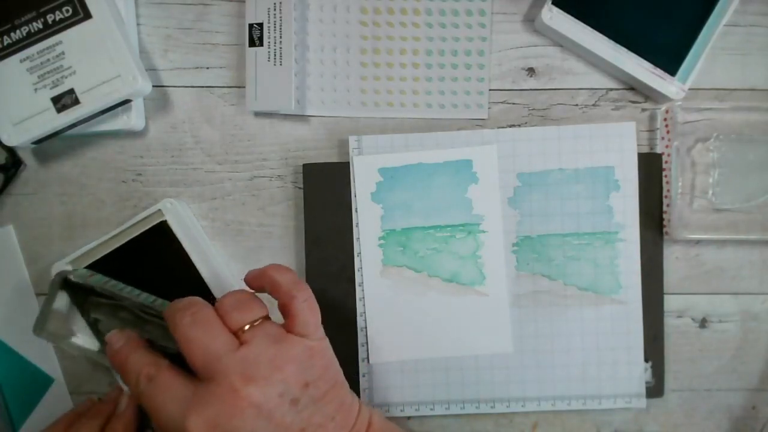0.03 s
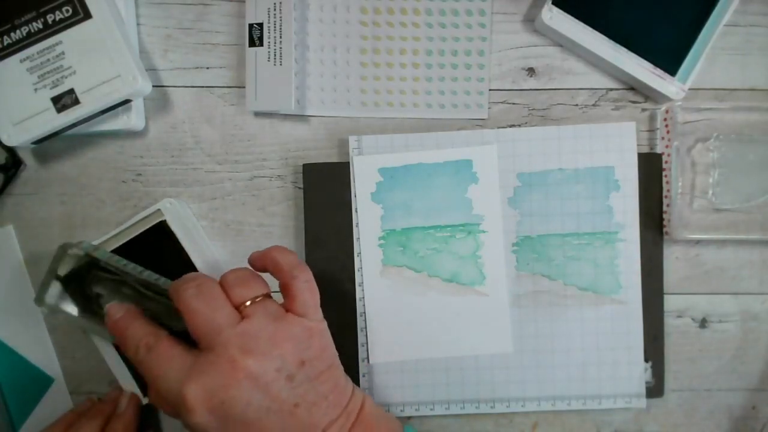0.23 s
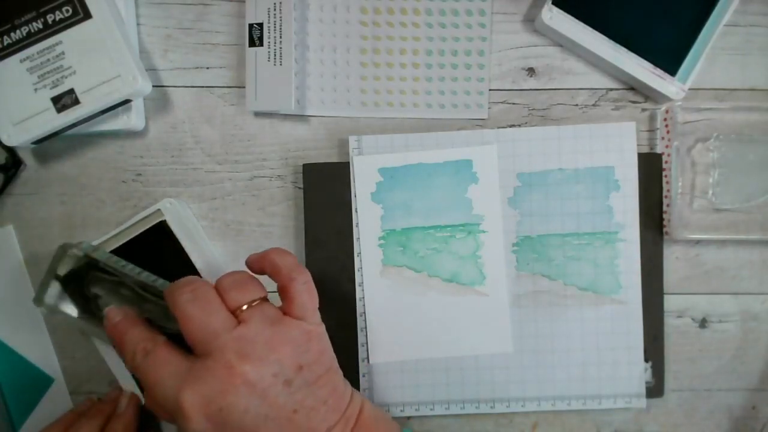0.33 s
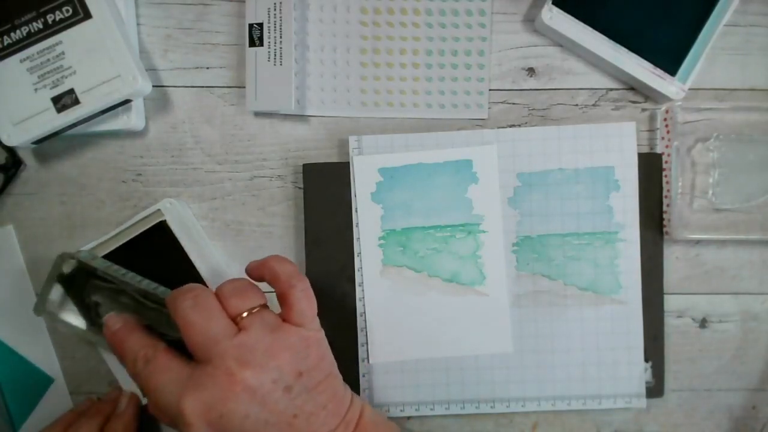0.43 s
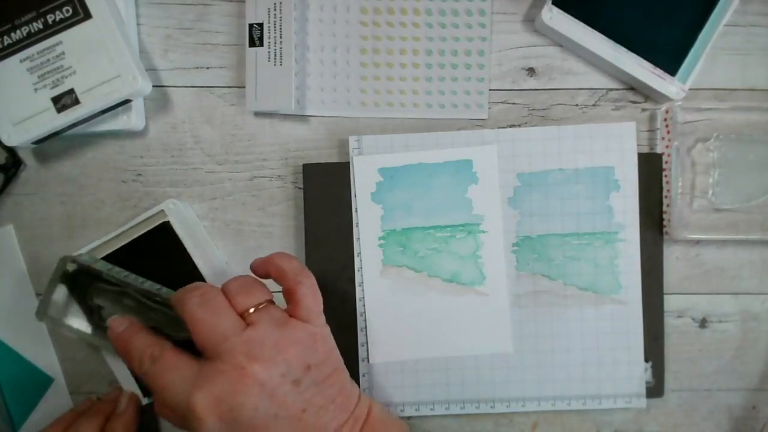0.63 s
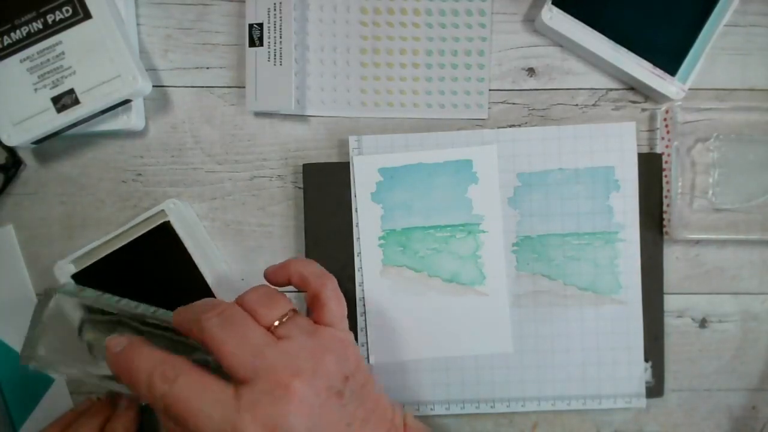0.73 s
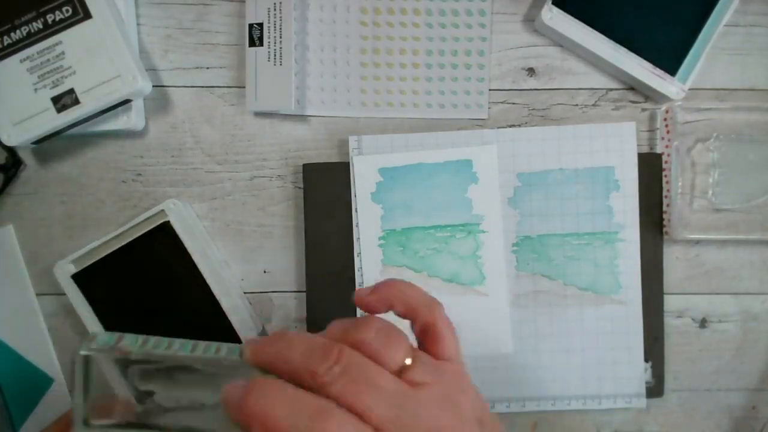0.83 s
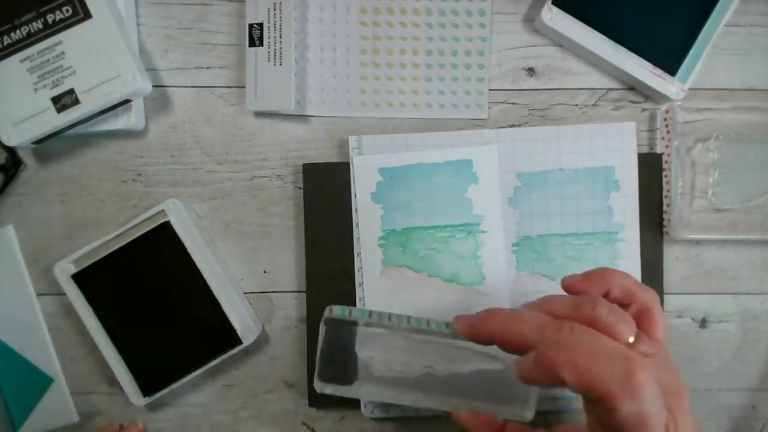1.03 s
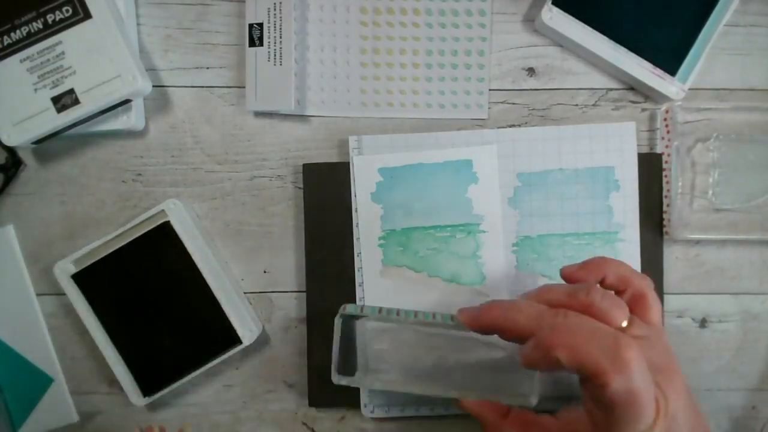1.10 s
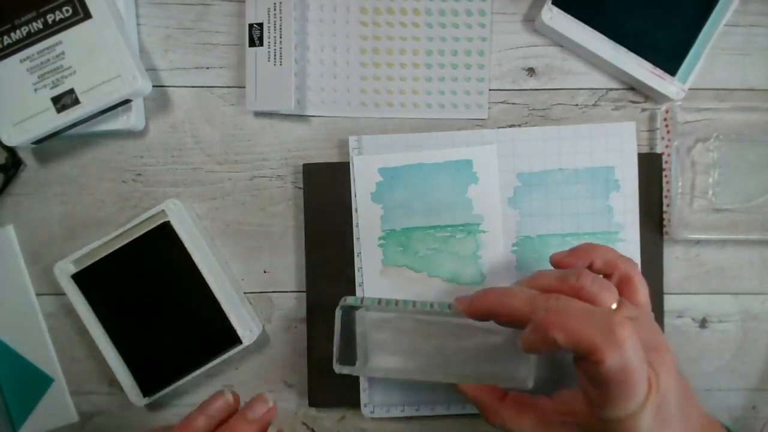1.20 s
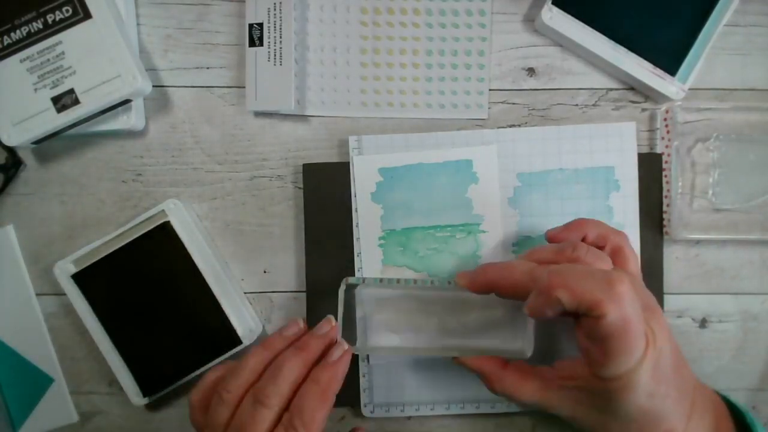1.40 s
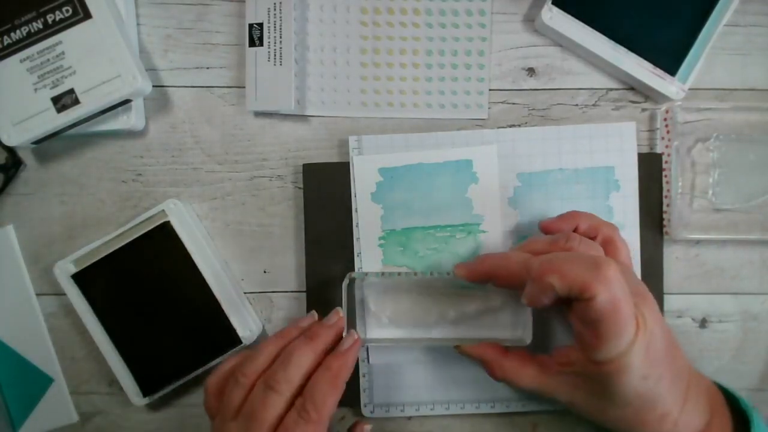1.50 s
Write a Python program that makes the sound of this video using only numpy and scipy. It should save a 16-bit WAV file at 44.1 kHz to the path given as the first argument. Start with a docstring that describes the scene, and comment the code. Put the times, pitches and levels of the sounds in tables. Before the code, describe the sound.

An acrylic stamp block taps three times on an ink pad, each tap thumping the desk, the last clacking the plastic case. A sleeve then brushes softly along, heard close up in a small, quiet room.

```python
"""A desk in a small, quiet room: an acrylic stamp block is tapped three times on an ink pad.
Each tap makes the desk boom and knock; the last and hardest also clacks the pad's plastic case.
The block peels off the tacky pad between taps and ticks in the grip, then a sleeve brushes along
as the block is carried away. Faint air noise and mains hum lie underneath."""
import sys
import numpy as np
from scipy import signal
from scipy.fft import rfft, irfft
from scipy.io import wavfile

SR = 44100
rng = np.random.default_rng(int(sys.argv[2]) if len(sys.argv) > 2 else 0)


def digitize_waveform(pressure):
    """Quantize a signal to 16-bit integers and store it at the path in sys.argv[1].

    Rows of a 2-D input are taken as channels; values are limited to [-1, 1].
    """
    field = np.atleast_2d(pressure).T
    bounded = np.clip(field, -1, 1)
    quanta = np.round(bounded * 32767).astype(np.int16)
    wavfile.write(sys.argv[1], SR, quanta)


N = 68355
T = np.arange(N) / SR

# The block hits the pad; the first tap lands in two stages and takes two rows:
# start_s, boom_db, knock_db, brightness_hz, block_db, case_db
BLOCK_TAPS = [(0.2208, -24, -40.5, 388, -44, -70), (0.244, -36.5, -46, 226.4, -69, -74),
              (0.4302, -19.5, -38, 450, -41, -48), (0.5953, -16, -30.5, 890, -33.5, -23.5)]
# The block pulls free of the ink: start_s, length_s, smack_db, boom_db
BLOCK_PEELS = [(0.013, 0.031, -54.5, -46.5), (0.323, 0.022, -51.5, -35), (0.507, 0.015, -52, -30.5),
               (0.67, 0.012, -52, -37.5)]


def from_db(db):
    """Decibels to gain."""
    return 10 ** (np.asarray(db) / 20)


def butter(x, hz, kind, order=2):
    """Butterworth low- or high-pass."""
    return signal.sosfilt(signal.butter(order, hz, kind, fs=SR, output="sos"), x + 1e-18)


def click(start_s):
    """A one-sample impulse of height 1."""
    return 1.0 * (np.arange(N) == int(start_s * SR))


def decay(start_s, t60_s):
    """An envelope that jumps to 1, then falls 60 dB in t60_s."""
    return (T >= start_s) * np.exp(-np.log(1000) * np.maximum(T - start_s, 0) / t60_s)


def noise(spectrum):
    """Noise at rms 1, coloured by (freq_hz, level_db) points on a log-frequency axis."""
    freq_hz, level_db = np.transpose(spectrum)
    bin_hz = np.arange(N // 2 + 1) * SR / N
    colour_db = np.interp(np.log(np.maximum(bin_hz, 1)), np.log(freq_hz), level_db)
    coloured = irfft(rfft(rng.standard_normal(N)) * from_db(colour_db), N)
    return coloured / coloured.std()


def ring(force, pitch_hz, t60_s):
    """One resonance: a unit click sets off a dying sine of height 1."""
    radius = np.exp(-np.log(1000) / (t60_s * SR))
    angle = 2 * np.pi * pitch_hz / SR
    return signal.lfilter([0, np.sin(angle)], [1, -2 * radius * np.cos(angle), radius ** 2], force + 1e-18)


def strike(start_s, modes, spread_db=3):
    """A blow rings modes of alternating sign, in a slightly different balance every time."""
    ringing = 0
    for k, (pitch_hz, level_db, t60_s) in enumerate(modes):
        gain = from_db(level_db + spread_db * rng.standard_normal())
        ringing += (-1) ** k * gain * ring(click(start_s), pitch_hz, t60_s)
    return ringing


def room_tone(air_db=-64.5, hum_db=-71.5, hum_hz=120):
    """A bed of faint air noise and mains hum."""
    # Dark colour of the still air: freq_hz, level_db
    air_spectrum = [(25, 7), (55, 6.5), (120, 0.5), (200, -5), (350, -12), (530, -2), (650, -5), (950, -7),
                    (1200, -5), (1550, -7), (2000, -15), (2750, -13), (3300, -19.5), (4100, -21),
                    (5000, -30), (8000, -30.5), (15500, -37.5)]
    return from_db(air_db) * noise(air_spectrum) + from_db(hum_db) * np.sin(2 * np.pi * hum_hz * T)


def sleeve_brush():
    """Cloth slides along the desk edge, with more hiss when the arm moves fast."""
    # Level curves of the arm's sweep: time_s, rub_db, hiss_db
    sweep = [(0.681, -87.5, -90), (0.8, -67.5, -81.5), (0.9, -66, -76), (1.028, -59.5, -71),
             (1.152, -61.5, -76.5), (1.27, -63, -80.5), (1.365, -65.5, -74), (1.41, -65.5, -78.5),
             (1.44, -106, -81), (1.55, -102, -81.5)]
    # Midrange body of the rubbing cloth: freq_hz, level_db
    rub_spectrum = [(120, -21), (280, 7), (420, -2.5), (620, 7), (900, -0.5), (1200, 2), (1600, 1),
                    (2400, -7), (4000, -10), (5200, -22), (9000, -35.5)]
    # Its treble hiss: freq_hz, level_db
    hiss_spectrum = [(3000, 1), (5000, 2.5), (6600, -0.5), (8000, 3), (9500, 2.5), (11500, -6),
                     (15500, -5.5)]
    time_s, rub_db, hiss_db = np.transpose(sweep)
    rub = from_db(np.interp(T, time_s, rub_db)) * noise(rub_spectrum)
    hiss = from_db(np.interp(T, time_s, hiss_db)) * noise(hiss_spectrum)
    return (T > time_s[0]) * (rub + hiss)


def grip_ticks(t60_s=0.016):
    """The plastic ticks as the grip shifts."""
    # Tiny plastic pings: start_s, pitch_hz, level_db
    ticks = [(0.1068, 1850, -51.5), (0.1075, 5200, -58), (0.3463, 8340, -68), (0.6707, 2640, -62)]
    return sum(from_db(level_db) * ring(click(start_s), pitch_hz, t60_s)
               for start_s, pitch_hz, level_db in ticks)


def ink_peels(attack_s=0.0056, t60_s=0.16):
    """Tacky ink lets go with a soft smack that starts to fade halfway through the peel."""
    # Dull colour of the smack: freq_hz, level_db
    smack_spectrum = [(100, 0), (350, 13.5), (600, -3.5), (1200, -1), (1800, -15.5), (4000, -27.5),
                      (12000, -38)]
    envelope = 0
    for start_s, length_s, smack_db, _ in BLOCK_PEELS:
        attack = np.clip((T - start_s) / attack_s, 0, 1)
        release = np.exp(-np.log(1000) * np.maximum(T - start_s - length_s / 2, 0) / t60_s)
        envelope += from_db(smack_db) * attack * release
    return envelope * noise(smack_spectrum)


def desk_boom(lead_s=0.0025, nudge_cutoff_hz=53.6, low_cut_hz=38, high_cut_hz=158):
    """Taps push the desk top down, peels and soft nudges tug at it; it sways deeply."""
    # Bass modes of the desk top: pitch_hz, level_db, t60_s
    sway_modes = [(47.9, 5, 0.18), (49.56, -12, 0.84), (62.07, -8, 0.41), (82.45, -19, 0.57)]
    # The hand bumps the desk: start_s, boom_db
    hand_nudges = [(0.086, -56.5), (0.785, -40), (0.909, -44.5), (1.473, -59)]
    pushes = sum(from_db(boom_db) * click(start_s - lead_s) for start_s, boom_db, *_ in BLOCK_TAPS)
    tugs = sum(from_db(boom_db) * click(start_s) for start_s, *_, boom_db in BLOCK_PEELS)
    nudges = sum(from_db(boom_db) * click(start_s) for start_s, boom_db in hand_nudges)
    force = tugs + butter(nudges, nudge_cutoff_hz, "low") - pushes
    sway = sum(from_db(level_db) * ring(force, pitch_hz, t60_s) for pitch_hz, level_db, t60_s in sway_modes)
    sway = butter(sway, low_cut_hz, "high", order=3)
    return butter(sway, high_cut_hz, "low", order=1)


def desk_knock(shudder_db=-0.5, shudder_t60_s=0.19):
    """Strong modes over a dense shudder; the pad cushions each blow, and harder taps are brighter."""
    # Higher modes of the desk with the pad on it: pitch_hz, level_db, t60_s
    knock_modes = [(144.5, -2.5, 0.38), (194.4, -13.5, 0.53), (242.2, -1.5, 0.19), (285.9, 2, 0.12),
                   (334.6, -8.5, 0.15), (394, 1, 0.044), (420.2, -0.5, 0.1), (515.4, -2.5, 0.077),
                   (604, -5.5, 0.12), (622, -9.5, 0.19), (696, -3.5, 0.08), (853, -9.5, 0.17)]
    # Dense ringing of the desk and the things on it: freq_hz, level_db
    shudder_spectrum = [(100, -12), (200, 10), (300, -2), (500, -4.5), (800, 0), (1200, -12.5),
                        (1600, -21.5), (4000, -30)]
    knocks = 0
    for start_s, _, knock_db, brightness_hz, *_ in BLOCK_TAPS:
        shudder = from_db(shudder_db) * decay(start_s, shudder_t60_s) * noise(shudder_spectrum)
        blow = strike(start_s, knock_modes) + shudder
        knocks += from_db(knock_db) * butter(blow, brightness_hz, "low")
    return knocks


def stamp_clack(crack_t60_s=0.037, high_cut_hz=5370):
    """The block cracks and rings briefly on contact; the plastic case answers with a hollow clack."""
    # Noise burst of the contact: freq_hz, level_db
    crack_spectrum = [(300, 13), (1200, 12.5), (2300, -12), (3000, -19), (3700, -14), (5500, -36),
                      (9000, -17.5), (15000, -36.5)]
    # Acrylic block, damped by the fingers: pitch_hz, level_db, t60_s
    block_modes = [(2294, -20.5, 0.018), (3610, -23, 0.017)]
    # The pad's plastic case: pitch_hz, level_db, t60_s
    case_modes = [(685, -8.5, 0.015), (1034, -4, 0.038), (1146, -3, 0.046), (1249, -6, 0.02),
                  (1714, -16, 0.01), (2166, -23.5, 0.024)]
    clacks = 0
    for start_s, *_, block_db, case_db in BLOCK_TAPS:
        crack = noise(crack_spectrum) * decay(start_s, crack_t60_s)
        clacks += from_db(block_db) * (crack + strike(start_s, block_modes))
        clacks += from_db(case_db) * strike(start_s, case_modes)
    return butter(clacks, high_cut_hz, "low", order=3)


def scene():
    """Taps, handling sounds and room tone, mixed in mono."""
    taps = desk_boom() + desk_knock() + stamp_clack()
    handling = grip_ticks() + ink_peels() + sleeve_brush()
    return (taps + handling + room_tone())[None]


def record(dry):
    """A steep low-pass trims the highest treble."""
    cutoff_hz = 15700
    return signal.sosfilt(signal.ellip(10, .1, 70, cutoff_hz, fs=SR, output="sos"), dry)


dry = scene()
out = record(dry)
digitize_waveform(out)
```